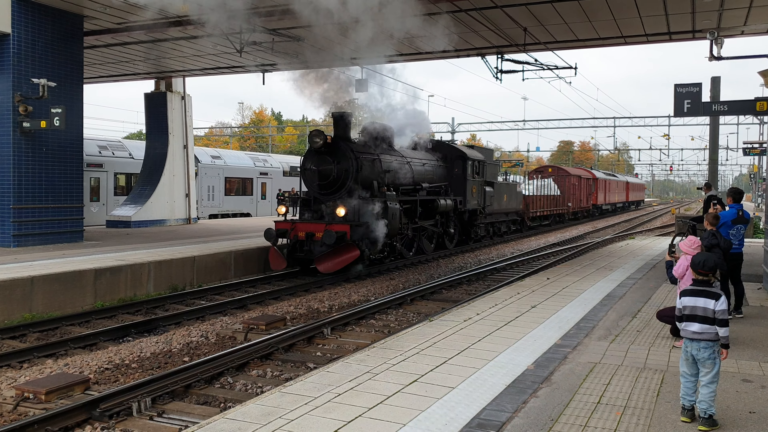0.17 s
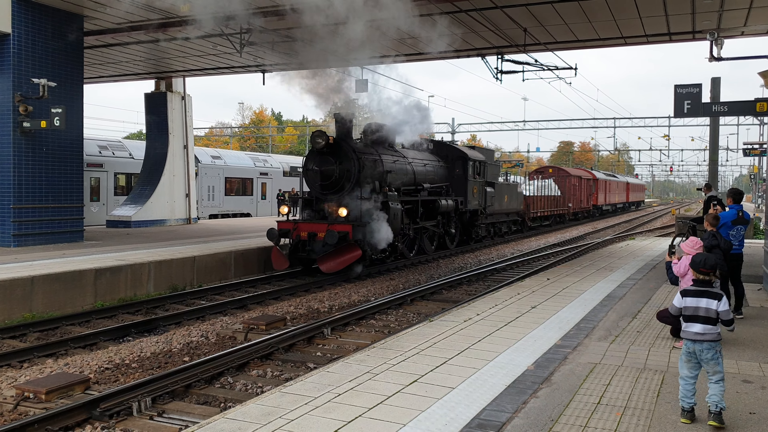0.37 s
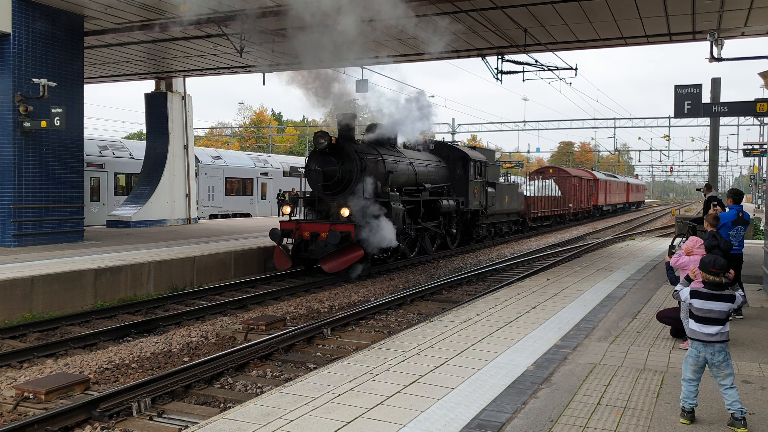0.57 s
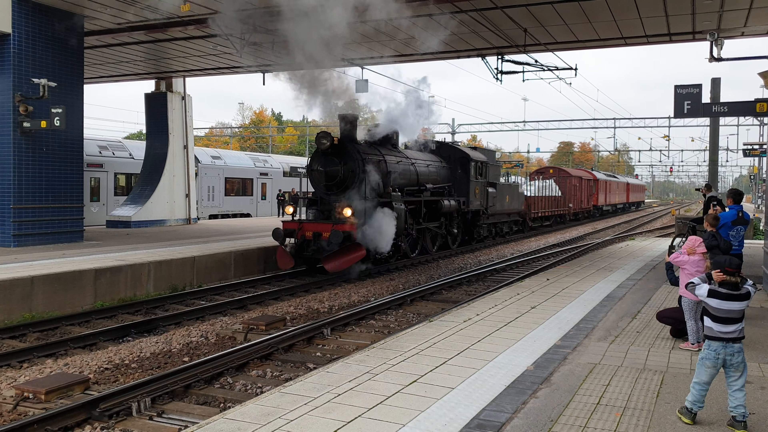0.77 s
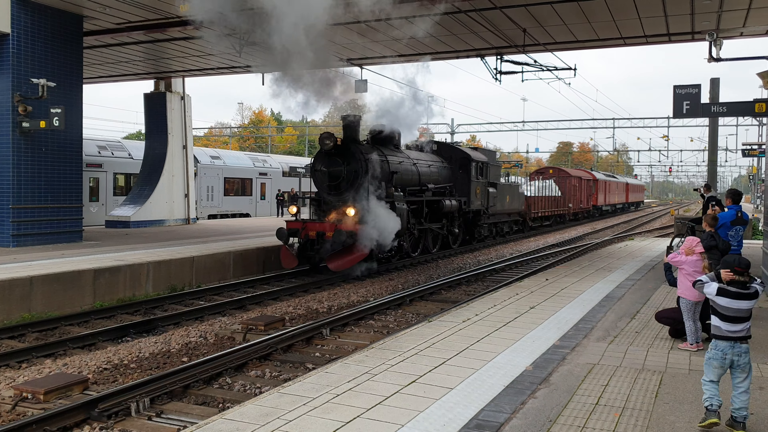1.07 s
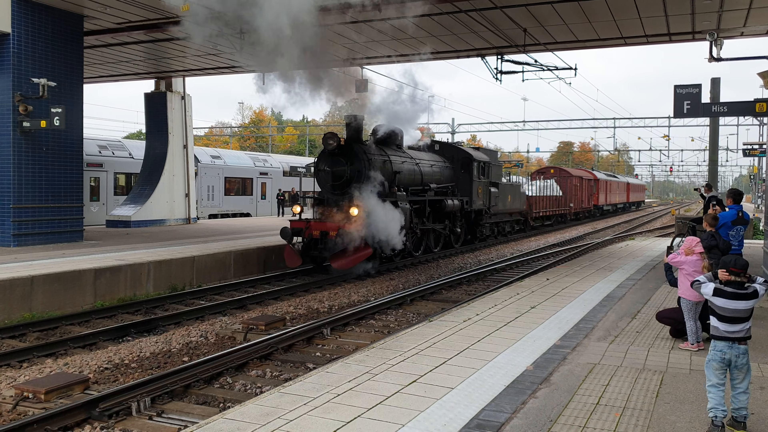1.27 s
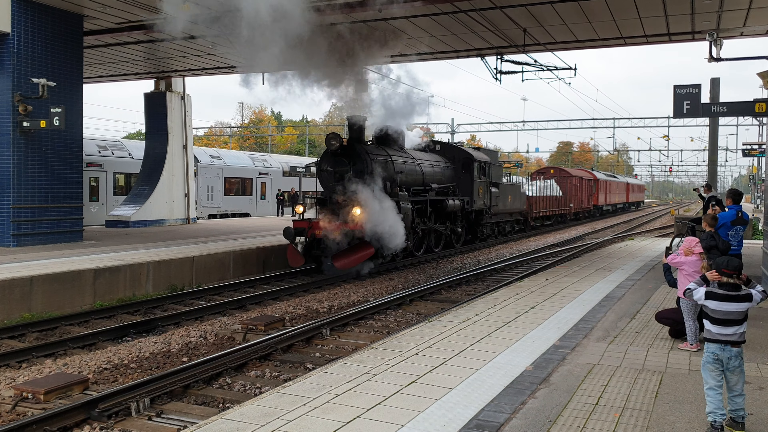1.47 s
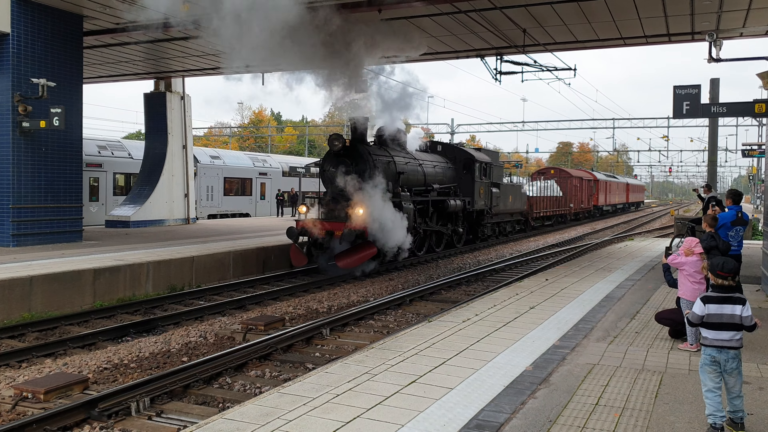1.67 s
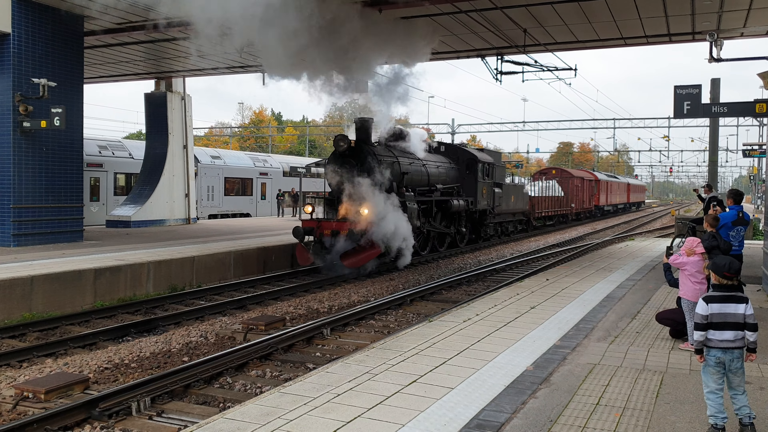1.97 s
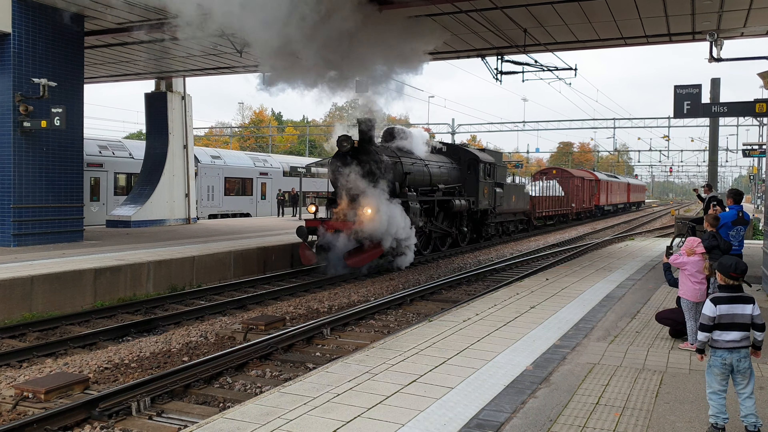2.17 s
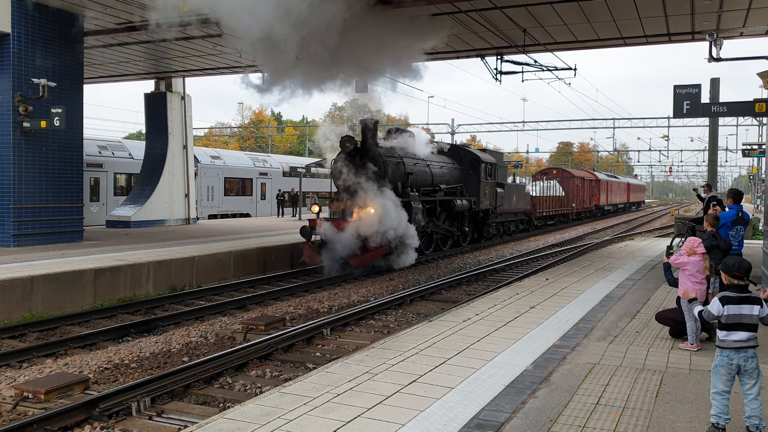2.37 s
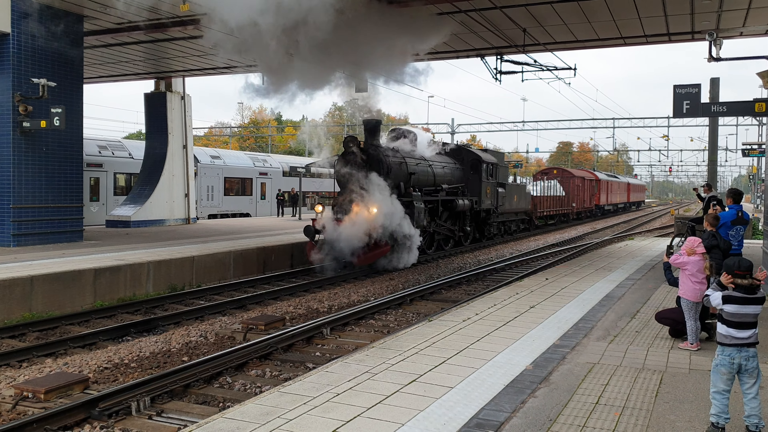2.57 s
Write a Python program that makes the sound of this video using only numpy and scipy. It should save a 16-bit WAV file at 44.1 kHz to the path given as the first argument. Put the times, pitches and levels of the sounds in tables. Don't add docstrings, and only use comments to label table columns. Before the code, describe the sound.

Sharp jet of steam from a slow locomotive fades to softer hiss around a single deep chuff

```python
import sys
import numpy as np
from scipy import signal
from scipy.fft import rfft, irfft
from scipy.io import wavfile
from scipy.ndimage import uniform_filter1d

SR = 44100
rng = np.random.default_rng(int(sys.argv[2]) if len(sys.argv) > 2 else 0)


def wav_out(sig):
    wavfile.write(sys.argv[1], SR, np.round(np.clip(np.atleast_2d(sig).T, -1, 1) * 32767).astype(np.int16))


def volts_from_db(level):
    exponent = np.asarray(level, float) / 20
    return 10 ** exponent


N = 119511
TIME = np.arange(N) / SR
FREQ = np.fft.rfftfreq(N, 1 / SR) + 1e-3

# (frequency [Hz], level [dB])
RUMBLE_TONE = [(25, 3), (55, 2), (100, -4.5), (330, -6.5), (450, -16.5), (620, -6.5), (1000, -18.5),
               (1500, -7)]
# (time [s], level [dB])
VALVE_FLOW = [
    (0, -25),
    (1.3, -25),
    (1.8, -26),
    (2.22, -27.3),
    (2.32, -28.5),
    (2.42, -29),
    (2.65, -27.7),
    (2.71, -28.5),
]
# (frequency [Hz], level [dB])
VALVE_TONE = [(300, -17.5), (1000, -16.5), (2500, -7), (3800, 0.5), (7200, 2), (8800, -4.5), (11800, 4),
              (15500, -1)]
# (frequency [Hz], width [Hz], boost [dB])
VALVE_RINGS = [(1976, 270, 11), (4750, 560, 1.7), (6300, 84, 2.3), (8000, 100, 0.67), (11230, 600, 2.8)]
# (time [s], level [dB])
COCK_FLOW = [(0, -19.5), (.14, -20), (.19, -21.5), (.24, -20), (.32, -20), (.36, -25), (.69, -24.5),
             (.74, -22), (.81, -25), (.9, -24.3), (1.2, -26), (1.28, -34), (1.64, -36), (1.73, -28),
             (1.79, -36), (2.71, -44)]
# (frequency [Hz], level [dB])
COCK_TONE = [(300, -11.5), (1000, -12), (2500, -6), (3700, -1), (5200, -10.5), (7000, -3), (8700, -2),
             (13000, 0.5)]
# (frequency [Hz], width [Hz], boost [dB])
COCK_RINGS = [(793, 32, 13.5), (1420, 220, 7.5), (2130, 100, 11), (3870, 157, 10), (4470, 194, 16.5),
              (6100, 300, 17), (6860, 67, 16), (7540, 100, 14.5), (9710, 350, 8.5), (11150, 450, 5),
              (13100, 1300, 5)]
# (delay [s], level [dB])
BOUNCES = [(.0017, -21), (.0043, -20), (.0079, -19), (.0131, -19), (.0223, -20)]
# (frequency [Hz], width [Hz], level [dB], delay after the beat [s])
CHIMNEY = [(65, 110, -5.5, 0.0091), (161, 24, -1, 0.11), (244, 82, -6, 0.045), (324, 48, -11.5, 0.12),
           (606, 110, -4.5, -0.011), (650, 430, -9.5, 0.11), (873, 28, -4, 0.045), (1290, 650, -12, 0.038),
           (2000, 490, -3.5, 0.067)]
# (delay [s], level [dB])
ECHOES = [
    (.175, -13),
    (.275, -19),
]
# (frequency [Hz], share [0-1])
LIKENESS = [(60, .99), (300, .95), (700, .85), (1100, .6), (2200, .8), (4800, .42), (9600, .75),
            (15000, .4)]
# (frequency [Hz], left minus right [dB])
SHADE = [(100, 2.5), (400, 3.5), (1000, 1), (4200, 0), (7000, 2.2), (9600, 3.9), (11000, 1.8), (15500, 1)]

COCK_LAG_S, VALVE_LAG_S = .000155, .00017
CHUFF_S, RISE_S, FALL_S, LOW_FALL_S = 1.345, .045, .033, .065
CHUFF_DB, TAIL_DB, TAIL_S = -26.5, -12, .08


def curve(table, at, log=False):
    x, y = np.array(table, float).T
    if log:
        return np.interp(np.log(at), np.log(x), y)
    return np.interp(at, x, y)


def walk(rate_hz):
    hold = int(SR / rate_hz)
    steps = rng.standard_normal(400)[:N // hold + 1]
    level = np.repeat(steps, hold)
    level = uniform_filter1d(uniform_filter1d(level, hold), hold)[:N]
    return 1.6 * (level - uniform_filter1d(level, 4 * hold))


def pair(lag_s, pan_db, spread=0.):
    a, b = rfft(rng.standard_normal((2, N)))
    like = curve(LIKENESS, FREQ, True) * (1 - spread / (1 + (3000 / FREQ) ** 8))
    mid = a * np.sqrt((1 + like) / 2)
    side = b * np.sqrt((1 - like) / 2)
    port_turn = 2.7 * np.tanh((FREQ / 1150) ** 2)
    turn = np.exp(-2j * np.pi * FREQ * lag_s + 1j * port_turn)
    tilt = volts_from_db((pan_db + curve(SHADE, FREQ, True)) / 2)
    return np.array([(mid + side) * turn * tilt, (mid - side) / tilt])


def turbulence(tone, rings, lag_s, pan_db, surge_db, flicker_db, surge_hz, spread=0.):
    db = curve(tone, FREQ, True) - 24 * np.log2(np.maximum(tone[0][0] / FREQ, 1))
    for hz, width, boost_db in rings:
        db = db + boost_db / (1 + (2 * (FREQ - hz) / width) ** 2)
    spec = pair(lag_s, pan_db, spread) * volts_from_db(db)
    surge = walk(surge_hz)
    place = 2 * np.log2(np.clip(FREQ, 40, 16000) / 40)
    out = 0
    for k in range(19):
        band = spec * np.maximum(1 - np.abs(place - k), 0)
        out = out + irfft(band, N) * volts_from_db(surge_db * surge + flicker_db * walk(18))
    return out / np.sqrt(np.mean(out ** 2))


def echoed(table):
    return sum(volts_from_db(db) * np.exp(-2j * np.pi * FREQ * lag) for lag, db in table)


def rumble():
    tone = RUMBLE_TONE + [(2500, -40)]
    return turbulence(tone, [], COCK_LAG_S, -1.1, 1.0, 3.3, 3.45) * volts_from_db(-40)


def valve():
    plume = turbulence(VALVE_TONE, VALVE_RINGS, VALVE_LAG_S, 0.3, .3, 1.2, 22, spread=.4)
    return plume * volts_from_db(curve(VALVE_FLOW, TIME) + 4)


def cock():
    jet = turbulence(COCK_TONE, COCK_RINGS, COCK_LAG_S, 1, .35, 1.5, 24)
    return jet * volts_from_db(curve(COCK_FLOW, TIME) + 4.5)


def bounced(hiss):
    return irfft(rfft(hiss) * (1 + echoed(BOUNCES)), N)


def chuff():
    spec = pair(COCK_LAG_S, -1.2)
    out = 0
    for hz, width, db, late_s in CHIMNEY:
        ring = irfft(spec / (1 + (2 * (FREQ - hz) / width) ** 2), N)
        power = uniform_filter1d(np.mean(ring ** 2, axis=0), int(SR / min(hz, width)))
        ring = ring / power ** .4
        t = TIME - CHUFF_S - late_s
        fall_s = FALL_S + LOW_FALL_S * 60 / hz
        puff = np.exp(-.5 * (t / np.where(t < 0, RISE_S, fall_s)) ** 2)
        tail = volts_from_db(TAIL_DB) * np.exp(-np.abs(t) / TAIL_S) * (t > 0)
        puff = np.maximum(puff, tail)
        out = out + ring / ring.std() * puff * volts_from_db(db + CHUFF_DB + 2.2 * walk(60))
    back = echoed(ECHOES) / (1 + (FREQ / 430) ** 2)
    return irfft(rfft(out) * (1 + back), N)


def scene():
    return rumble() + bounced(valve() + cock()) + chuff()


def top_cut(x):
    return signal.sosfilt(signal.butter(12, 15730, fs=SR, output="sos"), x)


def record(dry):
    band = (FREQ < 15730) / (1 + (48 / FREQ) ** 4)
    mix = irfft(rfft(dry) * band, N)
    return top_cut(mix)


dry = scene()
out = record(dry)
wav_out(out)
```